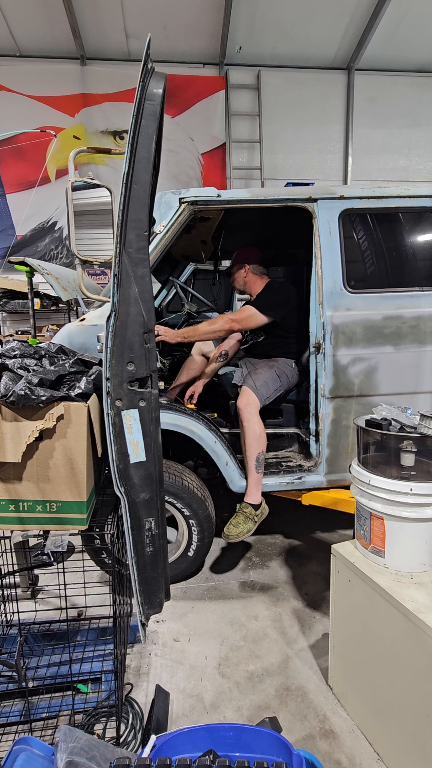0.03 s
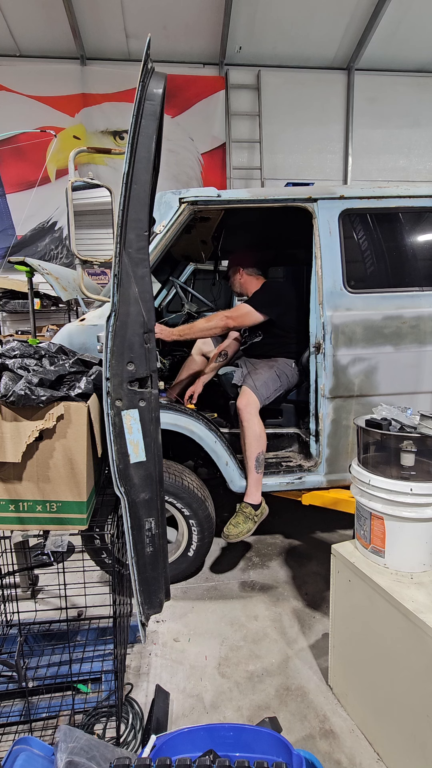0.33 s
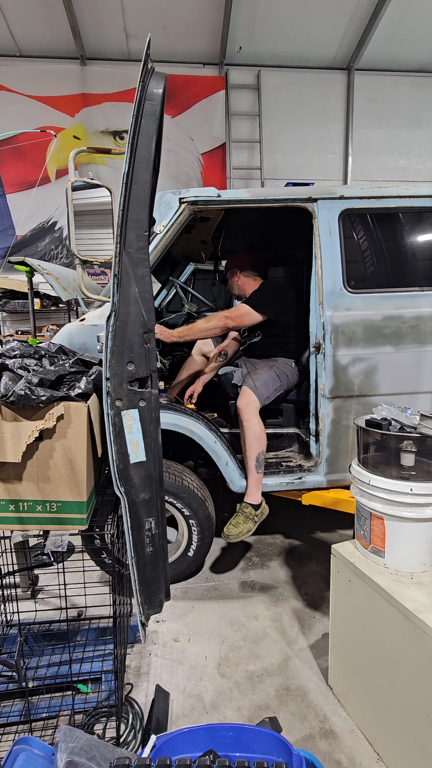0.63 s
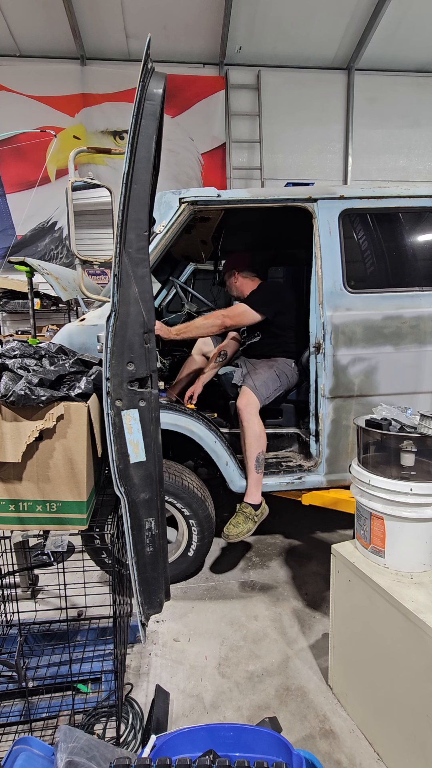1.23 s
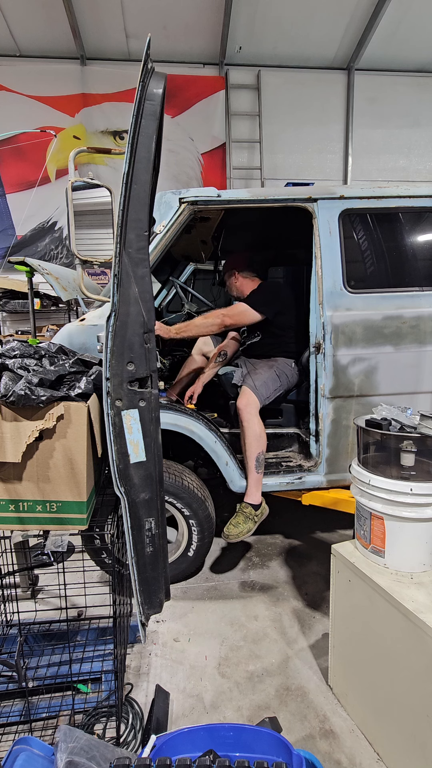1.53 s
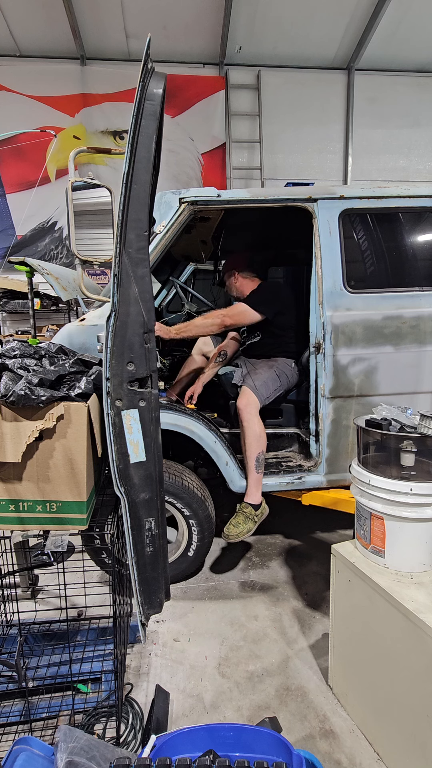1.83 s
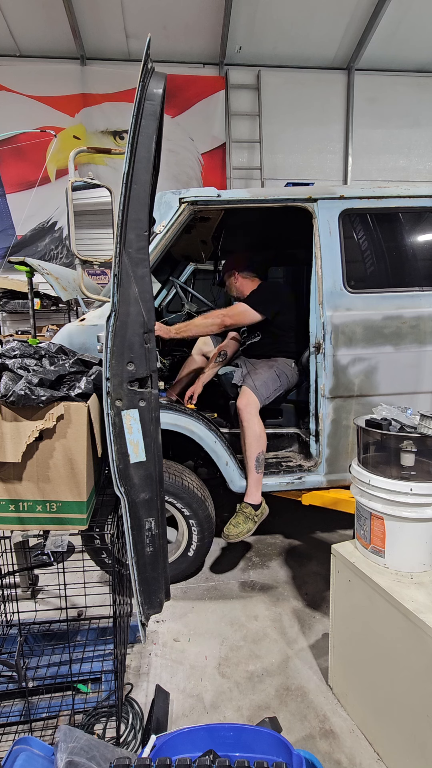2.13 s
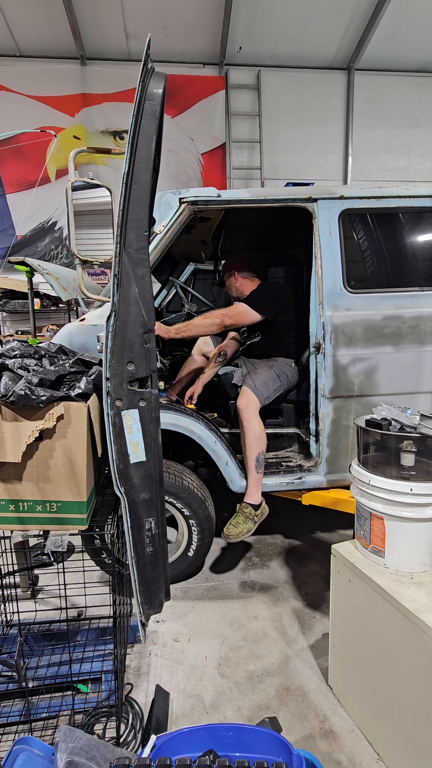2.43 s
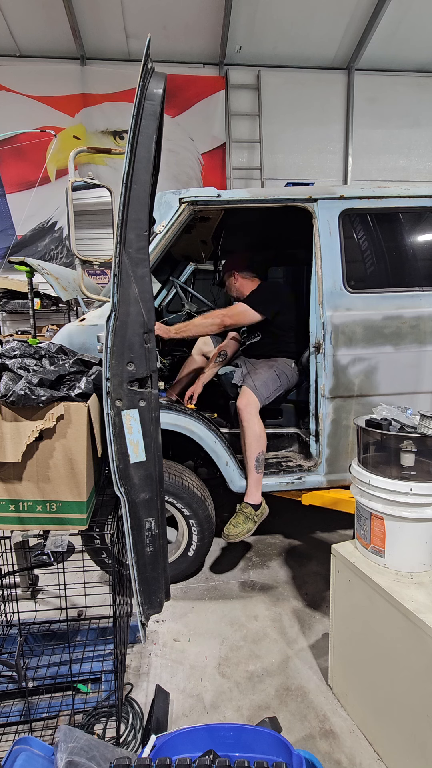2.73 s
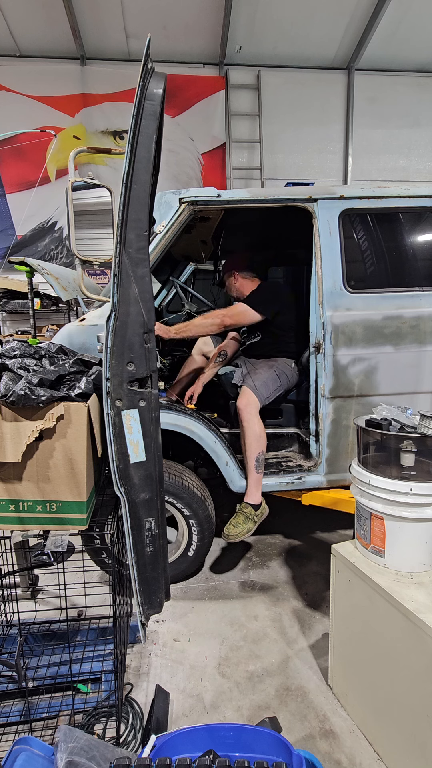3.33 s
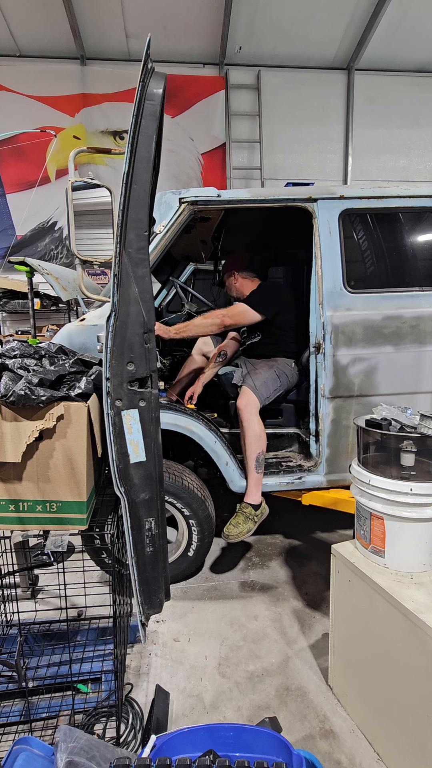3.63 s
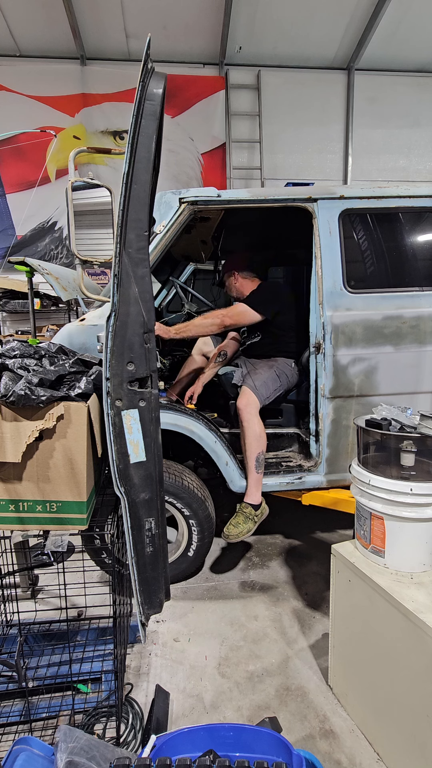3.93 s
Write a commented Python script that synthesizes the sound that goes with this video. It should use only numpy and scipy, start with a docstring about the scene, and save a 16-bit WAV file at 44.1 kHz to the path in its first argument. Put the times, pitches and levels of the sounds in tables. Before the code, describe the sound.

An old van's engine idles in a garage with an uneven throb, clatter, hiss and a thin whistle. It revs once with a rush of air, then burbles slowly back to idle as the fan belt chirps faintly.

```python
"""An old van's eight-cylinder engine idles in a garage: the exhaust throbs unevenly, the block clatters,
and the carburettor hisses and whistles past its nearly shut throttle. After a second the throttle is
blipped: the whistle fades, air rushes in and the engine speeds up, setting a body panel ringing.
As the throttle closes the exhaust burbles and the whistle returns. The engine sinks slowly back
to idle, and the fan belt chirps as it settles."""
import sys
import numpy as np
from scipy.fft import rfft, irfft, next_fast_len
from scipy.io import wavfile
from scipy.ndimage import map_coordinates

SR = 44100
rng = np.random.default_rng(int(sys.argv[2]) if len(sys.argv) > 2 else 0)


def digitize_waveform(pressure):
    """Quantize a signal to 16-bit integers and store it at the path in sys.argv[1].

    Rows of a 2-D input are taken as channels; values are limited to [-1, 1].
    """
    field = np.atleast_2d(pressure).T
    bounded = np.clip(field, -1, 1)
    quanta = np.round(bounded * 32767).astype(np.int16)
    wavfile.write(sys.argv[1], SR, quanta)


N = 176400

# Each row: time in seconds, crankshaft speed in turns per second.
CRANK_SPEED = [(0, 20.94), (.42, 19.93), (.62, 20.09), (.9, 19.49), (1, 20.07), (1.16, 32.79),
               (1.33, 34.92), (1.48, 33.41), (1.68, 27.81), (2, 25.49), (2.3, 23.49), (2.42, 21.95),
               (2.75, 19.83), (3.1, 18.38), (3.6, 18.97), (4, 19.16)]
# Each row: time in seconds, engine load from 0 to 1.
ENGINE_LOAD = [(1, 0), (1.13, 1), (1.45, .9), (1.75, 0)]
# Each row: time in seconds, gain of the exhaust note in dB.
EXHAUST_LEVEL = [(0, 2), (.92, .5), (1.01, -1.5), (1.15, 4), (1.45, 2), (1.61, -1), (1.67, -9.5),
                 (1.76, -.5), (2.33, .5), (2.43, -1.5), (4, -1)]
# Exhaust pipe and garage together. Each row: frequency in Hz, gain in dB.
PIPE_RESPONSE = [(30, -44), (36, -30), (40, -24), (54, -19), (66, -18.5), (76, -16), (87, -27), (95, -52),
                 (104, -33.5), (120, -25.5), (132, -30), (143, -26), (175, -40), (238, -34.5), (270, -46),
                 (420, -69)]
# Uneven cylinders spread the firing note (order 4) over its neighbouring multiples of the crank speed.
# Each entry: weight off load in dB, for orders 2 to 14.
ORDER_WEIGHTS = [4.5, -2.5, 3, 7.5, 4.5, 5.5, 1, -3.5, 1.5, -19, -1, 1.5, 3]
# Higher orders trail in each throb: much is a roll, little a compact chug.
# Each row: time in seconds, lag in radians per order squared.
ORDER_LAG = [(.97, .37), (1.17, .26), (2.2, .2), (2.55, .42), (2.8, .42), (3.1, .24)]
# Rough exhaust noise. Each row: time in seconds, level in dB.
BURBLE_LEVEL = [(1, -32), (1.2, -29), (1.42, -29), (1.52, -24), (1.67, -28), (1.8, -25.5), (2.4, -31.5)]
# Each row: frequency in Hz, relative level in dB.
BURBLE_SPECTRUM = [(20, -41), (45, -2), (170, -0.5), (260, -8), (340, -6), (410, -23.5), (800, -59)]

# Mechanical clatter. Each row: time in seconds, level in dB.
BLOCK_LEVEL = [(0, -30), (1, -32), (1.45, -29.5), (1.53, -30), (2.15, -29.5), (2.45, -31), (4, -30)]
# Each row: frequency in Hz, relative level in dB.
BLOCK_SPECTRUM = [(150, -51), (300, -11.5), (410, -17), (480, 1), (630, -4.5), (790, -3), (950, -10),
                  (1800, -16.5), (8000, -68)]
# Each row: centre in Hz, width in Hz, boost in dB.
BLOCK_MODES = [(563, 22, 6), (678, 18, 3), (750, 50, 3), (1021, 18, 6), (1302, 40, 8)]

# Hiss at the throttle plate. Each row: time in seconds, level in dB.
HISS_LEVEL = [(0, -31), (.97, -30.5), (1.02, -38), (1.4, -33), (1.53, -39), (1.7, -35.5), (1.78, -31.5),
              (2.18, -29.5), (2.41, -33.5), (2.48, -32), (2.7, -32), (2.95, -29)]
# Each row: frequency in Hz, relative level in dB.
HISS_SPECTRUM = [(300, 4), (1000, -12.5), (1700, 1.5), (2500, -0.5), (3400, 2.5), (5500, -2), (8000, -2),
                 (15500, -9)]
# The carburettor's cavities. Each row: centre in Hz, width in Hz, boost in dB.
CAVITY_MODES = [(3630, 100, 3.3), (4350, 78, 4.3), (5420, 280, 3.3), (6297, 260, 9.8), (11570, 310, 7.2)]
# Each row: time in seconds, boost of the treble and equal cut of the body in dB.
HISS_BRIGHTNESS = [(1.7, 0), (2.15, 4.5), (2.55, 2.5), (3, 1.5)]

# Air drawn through the open throttle. Each row: time in seconds, level in dB.
RUSH_LEVEL = [(1.05, -48), (1.11, -24), (1.19, -21), (1.27, -20.5), (1.41, -29), (1.5, -35.5), (1.62, -65)]
# Each row: frequency in Hz, relative level in dB.
RUSH_SPECTRUM = [(300, -27), (1000, -2), (2300, -12), (3700, -4), (5000, -6.5), (7400, -5.5), (11500, -7),
                 (15500, -6.5)]
# Each row: centre in Hz, width in Hz, boost in dB.
RUSH_MODES = [(3780, 120, 2.8), (7300, 220, 6), (11400, 330, 8.6)]
# The intake's low roar. Each row: frequency in Hz, relative level in dB.
ROAR_SPECTRUM = [(120, -16), (300, -1), (420, -2), (800, 2), (1150, -11), (2500, -17)]

# Whistle at the throttle's edge. Each row: time in seconds, pitch in Hz, level in dB.
EDGE_TONE = [(0, 6352, -33), (.17, 6345, -29), (.5, 6337, -34), (.62, 6338, -30), (.92, 6342, -31),
             (1.04, 6290, -50), (1.39, 6360, -38), (1.53, 6405, -48), (1.68, 6390, -41), (1.8, 6338, -35),
             (2.4, 6320, -40), (2.9, 6240, -54), (4, 6325, -41)]
# Each row: time of the peak in seconds, level in dB.
PANEL_SWELLS = [(1.15, -24.5), (1.39, -23.5), (1.475, -24), (1.92, -27.5), (2.13, -29), (2.26, -30.5)]
# Each row: time of the peak in seconds, level in dB, pitch in Hz.
BELT_CHIRPS = [(2.96, -35, 4390), (3.23, -35, 4450), (3.35, -40, 4230), (3.5, -41, 4230), (3.63, -36, 4260)]
# Likeness of left and right. Each row: frequency in Hz, coherence from 0 to 1.
COHERENCE = [(120, 0.9), (480, 0.76), (950, 0.18), (1900, 0)]


def exhaust(speed, angle):
    """Harmonics of the crank speed slide through the pipe's resonances; under load they fall off evenly."""
    load, lag = curve(ENGINE_LOAD), curve(ORDER_LAG)
    loaded_base_db, fall_db_per_octave = -17.5, 7.5
    flutter_db, jitter_rad = .6, .06
    note = np.zeros(N)
    for order, weight_db in enumerate(ORDER_WEIGHTS, 2):
        idle_db = weight_db + along(PIPE_RESPONSE, order * speed)
        loaded_db = loaded_base_db - fall_db_per_octave * np.log2(order / 2)
        level_db = (1 - load) * idle_db + load * loaded_db + flutter_db * wobble(8.1)
        phase = 2 * np.pi * order * angle - lag * order ** 2
        jitter = jitter_rad * (1 + load * order) * wobble(45)  # load roughens the note
        note += amp(level_db) * np.cos(phase + jitter)
    return amp(curve(EXHAUST_LEVEL)) * note


def burble(angle):
    """Amplitude modulation: rough exhaust noise swells with each firing and each crank turn."""
    throb = pulsation(angle, order=4, depth_db=1.5) * pulsation(angle - .2, order=1, depth_db=1.5)
    return amp(curve(BURBLE_LEVEL)) * throb * garage_noise(BURBLE_SPECTRUM)


def block_clatter(angle):
    """Forced vibration: firings and valve gear shake the block, which rings in its modes."""
    firings = pulsation(angle, order=4, depth_db=1.8)
    valve_gear = pulsation(angle, order=.5, depth_db=.8)
    shake = amp(.9 * wobble(25)) * firings * valve_gear
    return amp(curve(BLOCK_LEVEL)) * shake * garage_noise(BLOCK_SPECTRUM, BLOCK_MODES)


def throttle_hiss(angle, crossover_hz=6000):
    """Turbulence at the nearly shut throttle excites cavity resonances and pulses with the intake."""
    air = garage_noise(HISS_SPECTRUM, CAVITY_MODES)
    body = filtered(air, lambda hz: 1 / (1 + (hz / crossover_hz) ** 2))
    treble = air - body
    tilt = amp(curve(HISS_BRIGHTNESS))
    pulsing = amp(.75 * wobble(35)) * pulsation(angle, order=2, depth_db=.8)
    return amp(curve(HISS_LEVEL)) * pulsing * (body / tilt + treble * tilt)


def intake_rush():
    """Turbulent flow through the open throttle: a bright rush over a roar that barks at full throttle."""
    air = garage_noise(RUSH_SPECTRUM, RUSH_MODES)
    bark_db = 5.5 * bell_curve(peak_s=1.202, width_s=.024)
    roar = amp(bark_db) * garage_noise(ROAR_SPECTRUM)
    return amp(curve(RUSH_LEVEL)) * (air + roar)


def throttle_whistle(angle, waver_hz=9, flicker_db=3.5):
    """An edge tone flutters with the intake cycle; the garage makes it flicker differently on each side."""
    phase = running_phase(curve(EDGE_TONE) + waver_hz * wobble(97))
    sides = np.array([amp(flicker_db * wobble(55)) * np.sin(phase + shift) for shift in (0, 1.2)])
    flutter = pulsation(angle, order=.5, depth_db=2)
    return amp(curve(EDGE_TONE, column=2)) * flutter * unit_rms(sides)


def body_panel(mode_hz=560, waver_hz=9):
    """Resonance: a panel shaken by the engine rings up briefly at its own pitch, at the listed times."""
    phase = running_phase(mode_hz + waver_hz * wobble(30))
    return swells(PANEL_SWELLS, width_s=.034) * np.sin(phase)


def fan_belt(rough_hz=55.3):
    """The belt chirps at slightly varying pitches; random frequency modulation makes it rough."""
    hz = curve(BELT_CHIRPS, column=2) + rough_hz * np.array([wobble(400), wobble(400)])
    return swells(BELT_CHIRPS, width_s=.027) * np.sin(running_phase(hz))


def garage_noise(spectrum, modes=(), ripple_db=2, ripple_step_hz=22):
    """Stereo noise of rms 1; interfering reflections ripple its spectrum and decorrelate its treble."""
    def response(hz):
        peaks_db = sum(db / (1 + (2 * (hz - centre) / width) ** 2) for centre, width, db in modes)
        knots = rng.standard_normal(int(hz[-1] / ripple_step_hz) + 4)
        ripple = map_coordinates(knots, [hz / ripple_step_hz])
        coherence = along(COHERENCE, hz)
        level_db = along(spectrum, hz) + peaks_db + ripple_db * (1 - coherence) ** 2 * ripple
        spread = np.arccos(coherence) / 2
        return amp(level_db) * [np.cos(spread), np.sin(spread)]
    mid, side = filtered(rng.standard_normal((2, N)), response)
    return unit_rms(np.array([mid + side, mid - side]))


def arrival_difference(hz, left_lag_s=.00015, balance_db=.27):
    """Interaural differences: low sound arrives earlier on the right and slightly louder on the left."""
    side = np.array([[1], [-1]])
    phase_gap = 2 * np.pi * np.minimum(hz, 450) * left_lag_s
    return amp(balance_db * side) * np.exp(-1j * side * phase_gap / 2)


def pulsation(angle, order, depth_db):
    """Periodic modulation: a gain that swells order times per crank turn."""
    return unit_rms(amp(depth_db * np.cos(2 * np.pi * order * angle)))


def bell_curve(peak_s, width_s):
    """A Gaussian envelope that falls to 1/e at width_s from its peak."""
    return np.exp(-((np.arange(N) / SR - peak_s) / width_s) ** 2)


def swells(rows, width_s):
    """Superposed Gaussian envelopes, one for each row."""
    return sum(amp(db) * bell_curve(peak_s, width_s) for peak_s, db, *_ in rows)


def running_phase(hz):
    """Phase in radians is the time integral of angular frequency."""
    return 2 * np.pi * np.cumsum(hz, axis=-1) / SR


def wobble(rate):
    """A smooth random fluctuation, rate knots a second."""
    return map_coordinates(rng.standard_normal(int(N * rate / SR) + 4), [np.arange(N) * rate / SR])


def curve(rows, column=1):
    """Linear interpolation of one column of a time table."""
    columns = np.transpose(rows)
    return np.interp(np.arange(N) / SR, columns[0], columns[column])


def along(rows, hz):
    """Interpolation on a logarithmic frequency axis."""
    frequencies, values = np.transpose(rows)
    return np.interp(np.log(hz + 1), np.log(frequencies + 1), values)


def filtered(x, response):
    """Linear filtering multiplies the spectrum by a frequency response."""
    size = next_fast_len(N + SR // 2)
    return irfft(rfft(x, size) * response(np.fft.rfftfreq(size, 1 / SR)), size)[..., :N]


def amp(db):
    """Decibels to amplitude ratio."""
    return 10 ** (np.asarray(db) / 20)


def unit_rms(x):
    """Normalisation to rms 1."""
    return x / np.sqrt(np.mean(x ** 2) + 1e-20)


def scene():
    """The sources add by superposition; one crankshaft keeps their pulsations in step."""
    speed = curve(CRANK_SPEED)
    angle = .1973 + np.cumsum(speed) / SR  # in turns
    engine = exhaust(speed, angle) + burble(angle) + block_clatter(angle) + body_panel()
    carburettor = throttle_hiss(angle) + intake_rush() + throttle_whistle(angle)
    return filtered(engine, arrival_difference) + carburettor + fan_belt()


def record(dry, cutoff_hz=15850):
    """Band limiting: an ideal low-pass filter passes nothing above its cutoff."""
    return filtered(dry, lambda hz: hz < cutoff_hz)


dry = scene()
out = record(dry)
digitize_waveform(out)
```